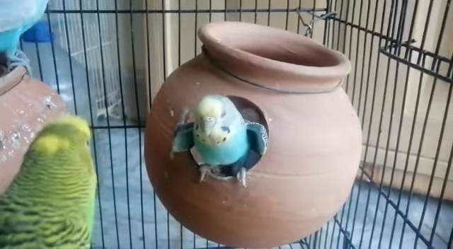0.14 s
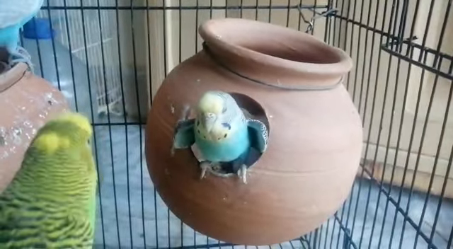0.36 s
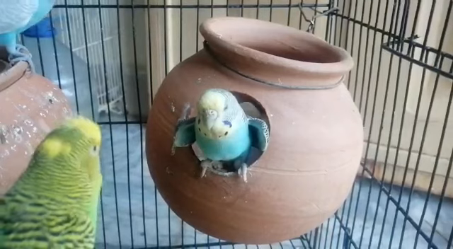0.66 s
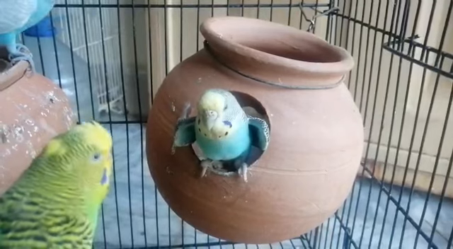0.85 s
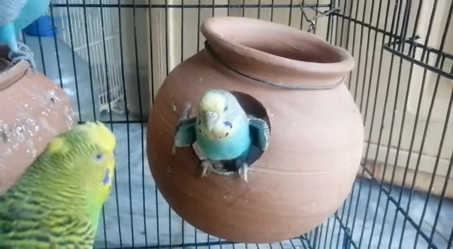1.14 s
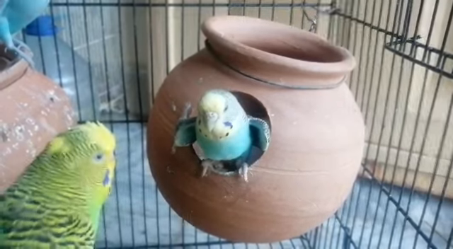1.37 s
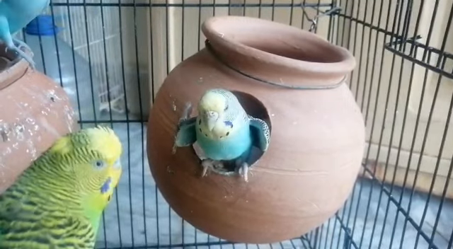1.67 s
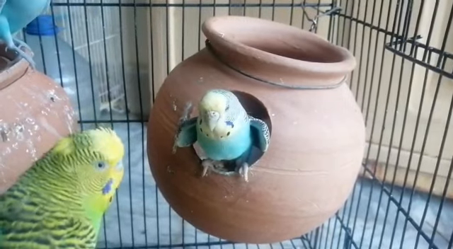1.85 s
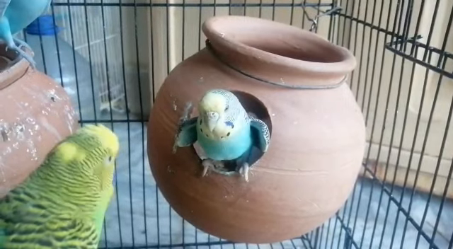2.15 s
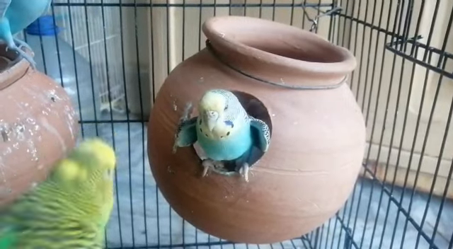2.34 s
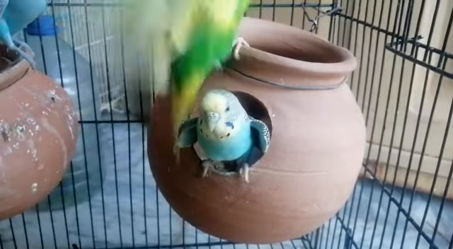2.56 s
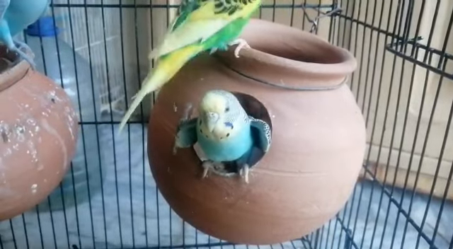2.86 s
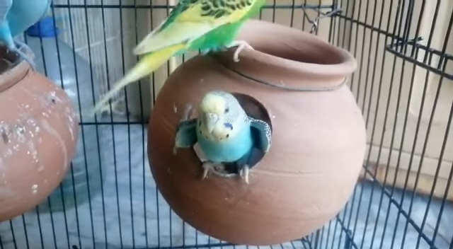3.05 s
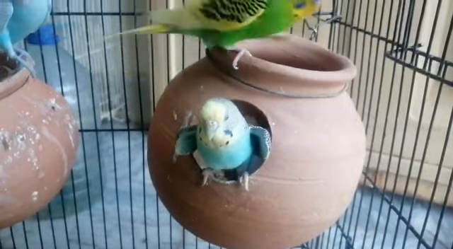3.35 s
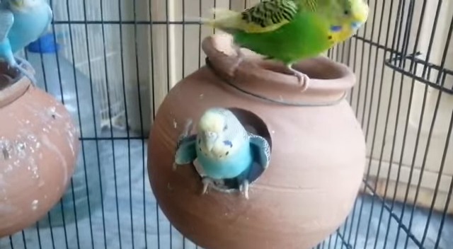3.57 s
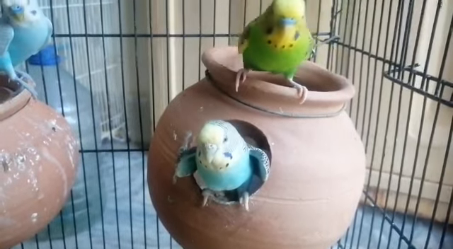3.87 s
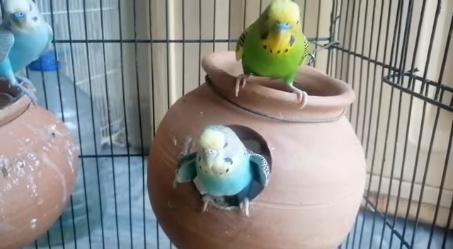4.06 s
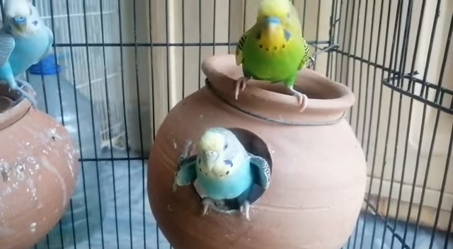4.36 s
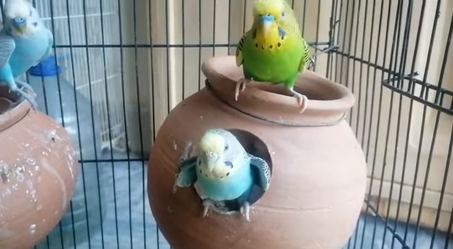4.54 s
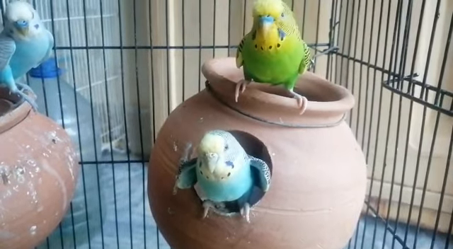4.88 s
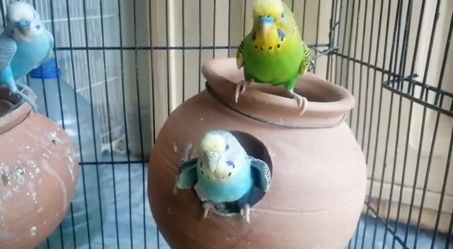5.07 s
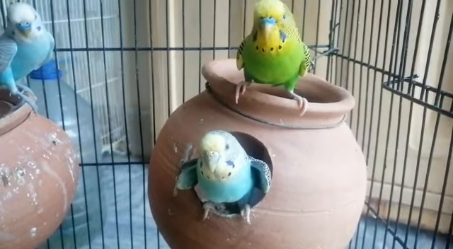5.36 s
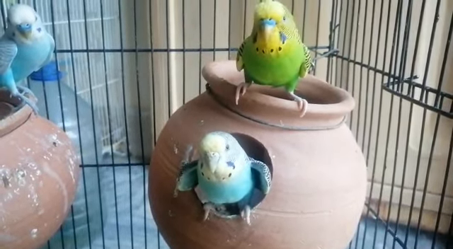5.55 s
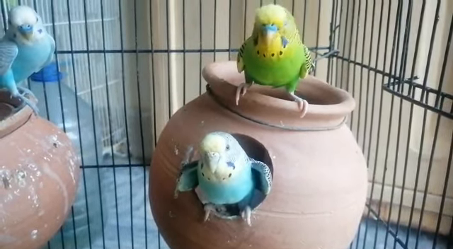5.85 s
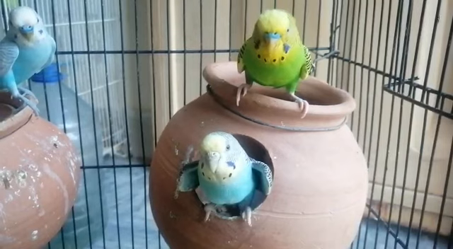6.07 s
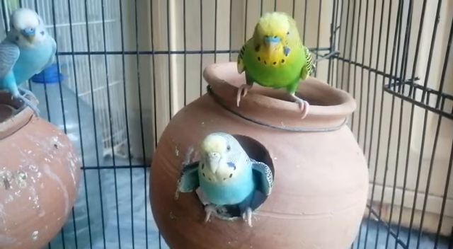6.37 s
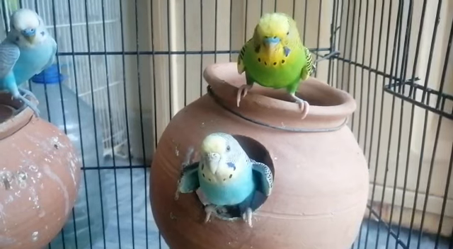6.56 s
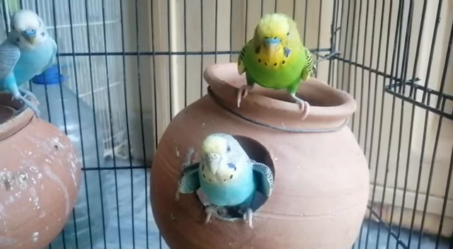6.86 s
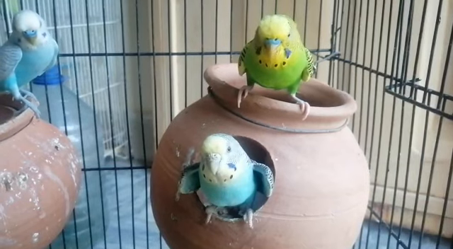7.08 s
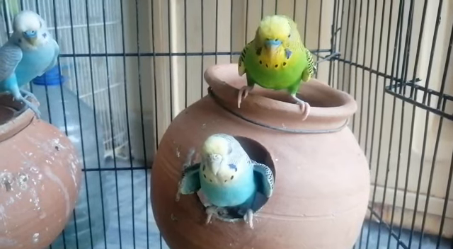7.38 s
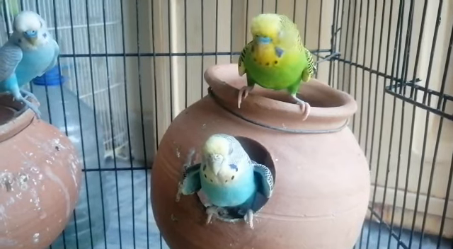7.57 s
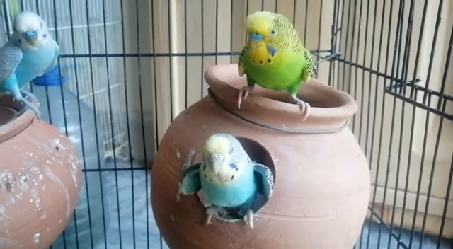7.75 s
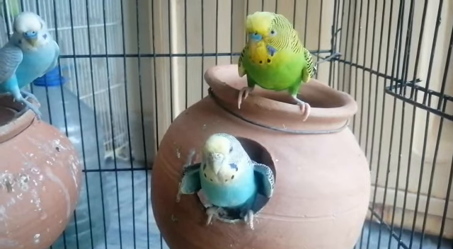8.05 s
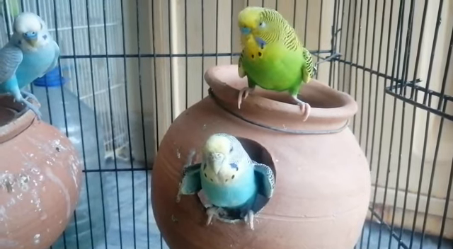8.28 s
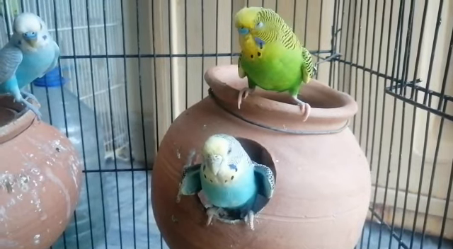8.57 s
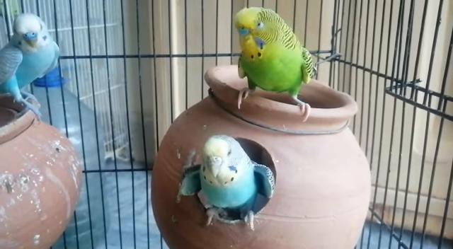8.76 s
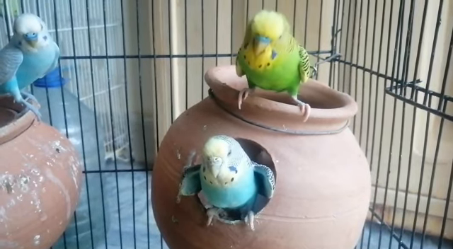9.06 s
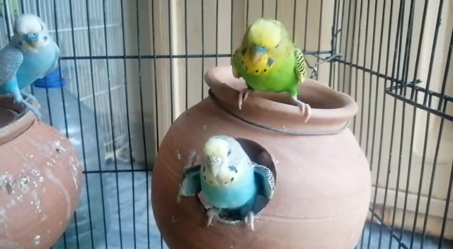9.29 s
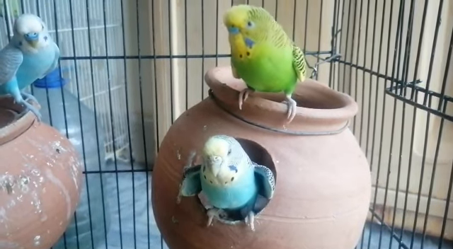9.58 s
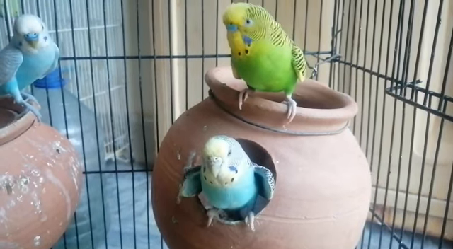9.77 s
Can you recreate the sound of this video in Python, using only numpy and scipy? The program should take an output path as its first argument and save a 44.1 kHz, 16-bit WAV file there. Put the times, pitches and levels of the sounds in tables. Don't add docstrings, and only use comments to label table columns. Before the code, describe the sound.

Close dry beak clicks, brief whistles and scratchy rasps stand in front of more distant, reverberant parrot calls. A faint flock fades away early; a wing flutter thumps softly at the left. Later come zigzag warbles, small croaks, faint feather brushes and foot rubs on clay, then a falling cry, a long rising call and a final flurry of harsh chirps. A small handheld stereo microphone catches soft air noise and low hum.

```python
import sys
import numpy as np
from scipy import signal
from scipy.fft import rfft, irfft
from scipy.io import wavfile
from scipy.ndimage import uniform_filter1d

SR = 44100
rng = np.random.default_rng(int(sys.argv[2]) if len(sys.argv) > 2 else 0)


def invert_db(level):
    return 10 ** (np.asarray(level, dtype=float) / 20)


def store_pcm(level_fs):
    pcm = np.round(np.clip(level_fs, -1, 1) * 32767).astype(np.int16)
    wavfile.write(sys.argv[1], SR, np.atleast_2d(pcm).T)


N = 437472
TIME_S = np.arange(N) / SR

# (frequency [Hz], rms level [dB])
HUM_LINES = [(50, -73), (100, -72.5), (150, -70.5), (200, -88)]
# (frequency [Hz], density [dB per Hz])
AIR_SPECTRUM = [(200, -6), (350, -6), (1000, -7.5), (1700, -11), (3000, -13), (4200, -23), (6500, -5.5),
                (8200, -20), (10500, -22.5), (15500, -28)]
# (frequency [Hz], density [dB per Hz])
RUMBLE_SPECTRUM = [(12, -25), (20, -21), (49, 10.5), (75, 0.5), (103, 1), (195, -0.5), (229, -7),
                   (500, -8.5), (650, -75), (1100, -120)]
# (time [s], half width [s], rise [dB])
RUMBLE_SWELLS = [
    (0.028, 0.048, 9.5),
    (2.62, 0.037, 13),
    (4.45, 0.09, 5),
    (5.299, 1, 6),
    (8.652, 0.35, 8),
]
# (time [s], level [dB])
FLOCK_LEVEL = [
    (0, -38.5),
    (.4, -47.5),
    (.8, -46),
    (1.2, -41),
    (1.6, -49),
    (2.0, -52.5),
    (2.4, -47.5),
    (2.7, -108),
    (9.92, -45.5),
]
# (pitch [Hz], share of notes [1])
FLOCK_PITCHES = [(3350, .5), (2800, 0.2), (2250, 0.3)]
# (frequency [Hz], decay time t60 [s])
PORCH_DECAY = [(300, 0.61), (1000, 0.6), (3000, 0.65), (6000, 0.61), (12000, 0.3)]
# (time [s], length [s], pitch [Hz], level [dB])
NASAL_CHURRS = [
    (0.042, 0.12, 1125, -43.5),
    (0.551, 0.21, 1105, -48),
    (0.855, 0.13, 1122, -43.5),
    (1.114, 0.085, 1130, -35),
    (1.412, 0.1, 1148, -43.5),
    (1.706, 0.091, 1110, -46.5),
    (1.989, 0.16, 1112, -46),
    (2.275, 0.086, 1137, -48.5),
]
# (frequency [Hz], gain [dB])
NASAL_THROAT = [(1100, -27.5), (2250, -5.5), (3350, 5), (4500, -9), (5600, -13.5), (6700, -16), (9000, -39)]
# (time [s], length [s], start pitch [Hz], end pitch [Hz], level [dB])
HARSH_CALLS = [
    (3.63, 0.12, 1150, 390, -45.5),
    (4.433, 0.12, 866, 629, -43),
    (7.096, 0.11, 1045, 375.5, -42),
]
# (time [s], length [s], start pitch [Hz], end pitch [Hz], level [dB])
RINGING_CALLS = [
    (0.89, 0.075, 1330, 1420, -41.5),
    (4.732, 0.098, 747, 642, -44.5),
    (7.382, 0.12, 1274, 992, -39),
]
# (time [s], length [s], start pitch [Hz], end pitch [Hz], level [dB])
ROUND_CALLS = [
    (0.485, 0.15, 1517, 1198, -53),
    (3.927, 0.024, 3130, 2510, -26.5),
    (3.952, 0.041, 1890, 1500, -44),
    (4.13, 0.17, 1088, 669.6, -46),
    (5.02, 0.11, 814, 677.5, -47.5),
    (7.703, 0.16, 1533, 1036, -34.5),
    (8.04, 0.26, 1210, 1583, -31),
]
# (frequency [Hz], gain [dB])
FAR_BIRD_THROAT = [(400, -7), (750, -3), (1600, -5.5), (2200, 4.5), (3100, 7.5), (4200, -9.5), (5500, -4.5),
                   (7200, -7), (9000, -40)]
# (frequency [Hz], gain [dB])
DEEP_THROAT = [(400, -2), (750, -3), (1500, -2), (2100, -8), (3200, 7), (4200, -8), (5500, -0.5),
               (7200, -18), (9000, -45)]
# (time [s], half width [s], level [dB])
POT_SHUFFLES = [
    (2.35, .06, -69),
    (2.97, 0.13, -60.5),
    (5.64, 0.033, -56.5),
    (6.06, 0.053, -60),
    (6.4, .06, -59),
]
# (time [s], level [dB])
FEATHER_BRUSHES = [
    (4.315, -53),
    (4.37, -58),
    (5.03, -53),
    (7.66, -51),
    (7.6, -60),
    (8.15, -51),
    (8.47, -49),
    (9.13, -52),
    (9.45, -54),
]
# (time [s], peak level [dB], swing frequency [Hz])
WING_PUFFS = [
    (2.57, -43, 48),
    (2.624, -46, 46.3),
    (2.677, -57, 44),
]
# (time [s], peak level [dB], left-right difference [dB])
WIRE_TICKS = [(0.2159, -48, 9.0), (0.3222, -40, 11), (0.3795, -40, 5), (1.2635, -47, 6.5), (1.8103, -48, 1),
              (1.9899, -51, 7), (2.17, -48, 7.0), (2.3491, -32, 8), (2.527, -37, 0), (3.933, -61, -3),
              (4.2323, -43, 6), (4.3096, -34, 9), (4.6349, -43, 0.0), (5.563, -24, -17.5), (5.6027, -31, 7),
              (5.6511, -36, 16), (6.611, -62, -6), (6.618, -48, 0), (6.65, -58, 0), (5.571, -45, -10),
              (7.1548, -45, 7), (7.4155, -38, 0.0), (7.7398, -35, 3), (8.427, -36, 0.5), (8.8209, -54, 0.5),
              (8.9955, -31, 10), (9.0743, -39, -1), (9.3442, -40, 13), (9.4015, -29, 7), (9.5342, -33, 2.5),
              (9.615, -31, 9), (9.698, -31, 10), (9.846, -51, -1)]
# (time [s], length [s], middle pitch [Hz], level [dB])
BACK_LIFTS = [(0.211, 0.015, 3050, -37), (0.605, 0.031, 2720, -63), (0.899, 0.032, 2850, -41),
              (1.25, 0.027, 3086, -31), (1.39, 0.021, 2777, -30.5), (1.406, 0.028, 3434, -34.5),
              (3.248, 0.023, 2950, -43.5), (3.441, 0.029, 3075, -31), (3.478, 0.033, 2744, -39),
              (3.73, 0.037, 2896, -41), (4.637, 0.01, 3230, -30.5), (6.16, 0.034, 3237, -39.5),
              (6.2, 0.027, 2630, -46.5), (6.625, 0.01, 1765, -40), (9.1, 0.017, 2970, -30.5),
              (9.189, 0.037, 2967, -28)]
# (time [s], length [s], middle pitch [Hz], level [dB])
BACK_DIPS = [(1.005, 0.044, 2204, -35), (1.611, 0.029, 2260, -42), (1.987, 0.013, 3350, -39.5),
             (3.508, 0.027, 2035, -44.5), (3.69, 0.0087, 2000, -31.5), (4.626, 0.017, 3090, -29.5),
             (8.319, 0.023, 2530, -36), (8.682, 0.035, 2380, -33.5), (8.913, 0.01, 3040, -47),
             (9.165, 0.036, 2834, -26), (9.398, 0.013, 2490, -39)]
# (time [s], peak level [dB], length [s], upper throat gain [dB])
RASP_CALLS = [(0.2093, -16.5, 0.028, -5), (0.441, -19.5, 0.027, -10), (0.607, -21.5, 0.022, -5),
              (0.865, -21, 0.03, -14), (1.252, -18, 0.019, 21), (2.932, -33.5, 0.037, -16),
              (3.07, -22.5, 0.016, -9.5), (3.234, -24, 0.013, -7), (3.302, -30, 0.038, 20),
              (3.336, -17, 0.023, -9.5), (3.44, -34, .03, 20), (4.365, -30, 0.016, -34),
              (4.624, -15, 0.025, -4), (5.555, -47, 0.0099, -15), (5.6, -18, 0.0083, -13),
              (5.75, -25.5, 0.03, 30), (5.868, -27, 0.018, 19.5), (5.647, -16.5, 0.018, -8),
              (6.27, -35.5, 0.062, 24), (7.343, -30.5, 0.029, -9), (8.714, -21.5, 0.0074, -15.5),
              (9.072, -12.5, 0.04, 31), (9.221, -16, 0.013, -26), (9.243, -19, 0.017, 38),
              (9.39, -14, 0.041, 69), (9.399, -15.5, 0.11, 87), (9.455, -31.5, 0.0073, 57),
              (9.609, -18.5, 0.03, 57), (9.691, -15, 0.017, -2), (9.72, -21, 0.057, -12),
              (9.526, -15.5, 0.036, 25)]
# (time [s], peak level [dB], length [s], lower throat gain [dB])
CROAK_CALLS = [(6.045, -24.5, 0.0039, -9), (6.324, -31.5, 0.023, 5.5), (6.348, -25, 0.019, 3),
               (6.4827, -33.5, 0.0062, 37), (6.521, -35, 0.0044, 21), (6.774, -31, 0.007, 5),
               (6.806, -24.5, 0.007, 3), (6.76, -38, 0.01, -2), (6.93, -32, 0.008, 16),
               (6.961, -30, 0.005, 8), (6.964, -23.5, 0.027, 2.5), (7.572, -21, 0.0056, -7),
               (8.819, -16, 0.0063, -27), (9.75, -24.5, 0.0073, 2.5)]
# (time [s], peak level [dB], upper throat gain [dB])
BEAK_CLICKS = [(0.737, -25, -18), (1.8098, -11.5, -4.5), (1.9901, -15.5, -1), (2.1706, -11, 2),
               (2.349, -11, 3), (2.5255, -16, -5), (5.153, -21, 28), (6.625, -29, -10),
               (7.325, -17.5, -16.5), (7.741, -12, 47), (7.952, -27, 1), (8.3363, -20, 7),
               (8.602, -28.5, -28), (9.0662, -14, -8.5), (9.8483, -14.5, -8.5)]
# (frequency [Hz], width [Hz], gain [dB])
THROAT_MODES = [(890, 260, 25), (1800, 1440, 24.5), (2422, 666, 32), (3350, 310, 32), (5127, 1190, 39),
                (6320, 1280, 38)]
# (level [dB], overtone tilt [dB per octave], path of (time [s], pitch [Hz]))
WARBLED_RUNS = [(-34.5, -2, [(5.648, 790), (5.665, 955), (5.682, 1054), (5.704, 947)]),
                (-37, -5.5, [(5.722, 2460), (5.733, 1940), (5.743, 2240), (5.754, 1850), (5.764, 2156),
                (5.774, 1640), (5.786, 1850)]), (-30, -9, [(5.848, 2350), (5.857, 2710), (5.865, 2700)]),
                (-37, -5, [(5.867, 1910), (5.874, 1565), (5.882, 1310)]), (-34.5, -2.5, [(5.897, 2857),
                (5.912, 2424), (5.922, 2435), (5.93, 1810), (5.94, 1540), (5.949, 1650)]),
                (-51, -34, [(6.69, 3500), (6.71, 3310), (6.735, 2980)]), (-42, -30, [(3.345, 1885),
                (3.357, 2270), (3.378, 2260)]), (-47, -27, [(0.5, 2950), (0.535, 2630), (0.555, 2050)]),
                (-28.5, -8.5, [(8.35, 3634), (8.372, 3104), (8.384, 2020)]), (-31, -10, [(8.413, 1905),
                (8.425, 3303), (8.442, 3213), (8.455, 2895), (8.466, 1690), (8.482, 2320)]),
                (-39.5, -16, [(8.654, 1930), (8.668, 2385), (8.681, 1700)]), (-29.5, -7, [(8.988, 1710),
                (9.0, 2620), (9.013, 1750)]), (-33.5, -9, [(9.44, 1837), (9.453, 3050), (9.466, 2300)]),
                (-28, -7.5, [(9.527, 1766), (9.541, 3380), (9.557, 2020)]), (-29, -6, [(9.611, 1650),
                (9.625, 3310), (9.638, 2010)]), (-25.5, -4, [(9.694, 1644), (9.708, 3390), (9.716, 2790)]),
                (-30.5, -16, [(3.648, 3600), (3.655, 3015), (3.668, 3300), (3.69, 3080)]),
                (-33, -20, [(3.738, 2500), (3.752, 3300), (3.77, 2700)]), (-36, -22, [(1.695, 2900),
                (1.72, 2390), (1.745, 2000)])]
# (frequency [Hz], gain [dB])
RUN_THROAT = [(800, 3), (1500, -8), (2100, -2.5), (3000, 6), (4200, -8), (5500, -0.5), (8000, -8),
              (12000, -30)]
# (time [s], pitch [Hz], level [dB])
NEAR_PIPS = [(0.032, 3390, -41), (0.459, 3190, -35), (0.876, 3310, -31), (2.524, 3350, -34),
             (5.155, 3300, -29), (5.544, 2584, -35), (5.596, 3084, -25.5), (6.144, 2227, -33),
             (6.207, 2420, -37.5), (6.808, 2255, -36), (7.057, 1875, -42.5), (0.699, 3194, -30.5),
             (8.699, 3140, -35), (8.945, 1610, -46.5), (7.985, 2460, -26), (8.601, 2450, -38)]
# (time [s], length [s], top pitch [Hz], climb [octaves], level [dB])
NEAR_ARCHES = [(0.316, 0.01, 2520, 0.427, -30), (0.376, 0.013, 2480, 0.53, -29),
               (3.339, 0.016, 882, 0.11, -39), (3.5, 0.055, 3350, 0.157, -51),
               (6.375, 0.0066, 2230, 0.19, -38), (6.331, .014, 800, .05, -49),
               (3.235, 0.011, 950, .1, -37.5), (6.596, 0.012, 2300, 0.19, -45.5),
               (4.8, 0.0146, 2930, 0.62, -42), (8.883, 0.033, 2620, 0.279, -33.5),
               (9.071, 0.024, 2470, 0.306, -29.5), (9.336, 0.028, 2740, 0.562, -28),
               (0.318, 0.0136, 5100, 0.25, -29)]
# (time [s], length [s], middle pitch [Hz], drop [octaves], level [dB])
NEAR_FALLS = [(2.635, 0.12, 3410, 0.21, -53), (3.771, 0.036, 2400, 1.33, -31),
              (4.4, 0.049, 2400, 0.43, -41), (4.366, 0.014, 1530, -0.074, -29),
              (5.061, 0.05, 3240, 1.28, -32), (8.007, 0.036, 2147, 0.92, -27), (3.6, 0.014, 2940, 0.3, -49),
              (3.622, 0.0093, 2900, .5, -33), (4.2, 0.015, 3650, .3, -52), (9.4, 0.012, 2710, 1.03, -36),
              (3.243, 0.024, 2700, 0.89, -37.5), (3.1, 0.04, 2600, 1, -37), (4.1, 0.013, 3000, 0.25, -35),
              (3.606, 0.016, 2200, 0.35, -44)]
# (time [s], length [s], landing pitch [Hz], swoop [octaves], level [dB])
NEAR_SWOOPS = [(1.38, 0.016, 3000, 0.93, -29.5), (6.82, 0.012, 2100, 0.2, -43),
               (7.318, 0.023, 840, 0.079, -41.5), (7.901, 0.059, 3110, -0.057, -27.5),
               (7.9, 0.0585, 2437, -0.26, -39), (8.815, 0.0096, 897, -0.31, -37.5),
               (9.116, 0.031, 3300, 0.57, -31), (9.146, 0.022, 3400, 0.53, -25),
               (9.115, 0.028, 1700, .4, -38), (9.706, 0.045, 640, 0.29, -49.5),
               (9.708, 0.015, 830, 0.014, -41), (9.368, 0.011, 880, 0.11, -51),
               (1.448, 0.08, 1200, 0.55, -51.5), (1.05, 0.0584, 1400, .4, -49.5),
               (0.604, 0.03, 1330, 0.05, -40), (0.625, 0.069, 1500, .03, -47),
               (3.085, 0.045, 1200, .1, -50), (3.66, 0.07, 2100, .2, -41.5), (8.14, 0.03, 750, 0.25, -47.5),
               (8.56, 0.028, 750, 0.22, -55.5)]
# (frequency [Hz], gain [dB])
WHISTLE_THROAT = [(400, -36), (750, -14), (1300, -13.5), (1900, -11.5), (2900, 15), (4100, 5), (5300, 20),
                  (7200, 21.5), (9000, 14.5), (15000, -20)]
# (frequency [Hz], left-right difference [dB])
PORT_COLOUR = [(250, -2), (500, 0), (1000, 3), (2500, -3), (4500, -7.5), (8000, 2.5), (12000, -1.5)]


def rms_one(x):
    return x / np.sqrt(np.mean(x ** 2) + 1e-20)


def at_hz(points, hz):
    table = np.array(points)
    return np.interp(np.log(hz), np.log(table[:, 0]), table[:, 1])


def spectrum_hz():
    return np.maximum(np.arange(N // 2 + 1) * SR / N, 1)


def drift(rate_hz):
    r = np.exp(-2 * np.pi * rate_hz / SR)
    settling = 9999
    noise = rng.standard_normal(N + settling)
    return rms_one(signal.lfilter([1], [1, -2 * r, r * r], noise)[settling:])


def resonance(x, hz, width_hz):
    r = np.exp(-np.pi * width_hz / SR)
    zeros = np.array([1, 0, -1]) * (1 - r * r) / 2
    return signal.lfilter(zeros, [1, -2 * r * np.cos(2 * np.pi * hz / SR), r * r], x)


def band(x, low_hz, high_hz):
    return signal.sosfilt(signal.butter(2, [low_hz, high_hz], "band", fs=SR, output="sos"), x)


def coloured(spectrum, alike):
    mid, side = rfft(rng.standard_normal((2, N)))
    hz = spectrum_hz()
    alike = np.clip(alike, 0, 1) / (1 + (hz / 1100) ** 2)
    pair = np.sqrt(1 + alike) * mid + np.sqrt(1 - alike) * side * [[1], [-1]]
    return rms_one(irfft(pair * invert_db(at_hz(spectrum, hz)), N))


def sides(pan_db):
    return invert_db(np.array([[.5], [-.5]]) * pan_db)


def add(track, start_s, sound):
    i = round(start_s * SR)
    track[..., i:i + sound.shape[-1]] += sound[..., :N - i]


def progress(length_s):
    return np.arange(round(length_s * SR)) / (length_s * SR)


def syrinx(pitch_hz, tilt_db, knee, throat, closed_db=0, first_db=0):
    k = np.arange(1, 25)[:, None]
    slope_db = tilt_db * np.log2(np.maximum(k / knee, 1)) + closed_db * np.log2(k) + first_db * (k == 1)
    gains = invert_db(slope_db + at_hz(throat, k * pitch_hz)) * (k * pitch_hz < 15000)
    phase = k * np.cumsum(2 * np.pi * pitch_hz / SR) + k * k / 2
    return rms_one(np.sum(gains * np.sin(phase), axis=0))


def mains_hum():
    return sum(invert_db(db) * np.sin(2 * np.pi * hz * TIME_S) for hz, db in HUM_LINES)


def air():
    return invert_db(-60.5 + 2.2 * drift(2.5)) * coloured(AIR_SPECTRUM, alike=.55)


def rumble():
    calm_db = -65.5
    rise_db = sum(db * np.exp(-((TIME_S - s) / width) ** 2) for s, width, db in RUMBLE_SWELLS)
    return invert_db(calm_db + rise_db) * coloured(RUMBLE_SPECTRUM, alike=0.77)


def ducking(birds):
    from_db, share, recovery_db_per_s = -37, 0.53, 34
    level_db = 10 * np.log10(uniform_filter1d(np.mean(birds ** 2, axis=0), size=1024) + 1e-12)
    ramp = recovery_db_per_s * TIME_S
    held_db = np.maximum.accumulate(level_db + ramp) - ramp
    return invert_db(-share * np.maximum(held_db - from_db, 0))


def flock():
    out, wobble = np.zeros(N), drift(323)
    pitches, shares = np.transpose(FLOCK_PITCHES)
    scatter = .16
    for when, pick, span, bow, slide, loud in rng.random((650, 6)):
        length_s = .012 + .03 * span
        u = np.arange(0, 1, 1 / (SR * length_s))
        choice = np.searchsorted(np.cumsum(shares / sum(shares)), pick)
        home = pitches[min(choice, len(pitches) - 1)]
        start = int(when * (N - len(u)))
        bend = scatter * (bow - .5) + .22 * (slide - .6) * (u - .5)
        pitch = home * (1 + bend + .045 * wobble[start:start + len(u)])
        phase = np.cumsum(2 * np.pi * pitch / SR)
        tone = np.sin(phase) + 0.52 * np.sin(2 * phase)
        add(out, start / SR, invert_db(10 * loud) * np.sin(np.pi * u) * tone)
    return invert_db(np.interp(TIME_S, *np.transpose(FLOCK_LEVEL))) * rms_one(out)


def porch(x, alike=0.0071):
    t, tail = np.arange(SR) / SR, 0
    common, left, right = rng.standard_normal((3, SR))
    noise = np.sqrt(alike) * common + np.sqrt(1 - alike) * np.array([left, right])
    edges = 200 * 2 ** np.arange(0, 6.6, .5)
    for low, high in zip(edges, edges[1:]):
        t60_s = at_hz(PORCH_DECAY, np.sqrt(low * high))
        tail = tail + band(noise, low, high) * invert_db(-60 * t / t60_s)
    tail = tail * (1 - np.exp(-t / 0.0036))
    tail = tail / np.sqrt(np.sum(tail ** 2) / 2)
    return signal.fftconvolve(x[None], tail, axes=1)[:, :len(x)]


def churrs():
    out, wobble = np.zeros(N), drift(106)
    for s, length, pitch_hz, level_db in NASAL_CHURRS:
        u = progress(length)
        shake = wobble[round(s * SR):][:len(u)]
        swell = np.sin(np.pi * u) ** 0.21 * invert_db(level_db + 5.26 * shake[::-1])
        add(out, s, swell * syrinx(pitch_hz * (1 + 0.0131 * shake), 0, knee=1, throat=NASAL_THROAT))
    return out


def far_bird(settle=.95):
    out, torn, wobble = np.zeros(N), np.zeros(N), drift(85)
    breath = 1.3 * np.tanh(drift(700))
    flutter = wobble[::-1]
    climb_share, climb_db, hold_loss_db, fall_loss_db = .55, 6.5, 25.5, 7
    opening_s, closed_tilt_db = .035, -22
    kinds = [(HARSH_CALLS, -2.5, 0), (RINGING_CALLS, -1.5, -13), (ROUND_CALLS, -11, -17)]
    calls = [(*row, tilt_db, harsh_db) for table, tilt_db, harsh_db in kinds for row in table]
    for s, length, start_hz, end_hz, level_db, tilt_db, harsh_db in calls:
        u, i = progress(length), round(s * SR)
        if end_hz > start_hz:
            climbed = u / climb_share
            way = np.minimum(climbed, 1)
            effort_db = np.minimum(climb_db * (climbed - 1), hold_loss_db * (1 - climbed))
        else:
            bend = settle * start_hz / end_hz
            way = (1 - np.exp(-bend * u)) / (1 - np.exp(-bend))
            effort_db = fall_loss_db * (.5 - u)
        pitch = (start_hz + (end_hz - start_hz) * way) * (1 + 0.0073 * wobble[i:][:len(u)])
        effort_db = effort_db + 3 * flutter[i:][:len(u)]
        attack_s = max(0.0087 * (800 / start_hz) ** 3, .007)
        edges = np.minimum((1 - u) / 0.22, 1) * np.minimum(u * length / attack_s, 1)
        swell = invert_db(level_db + effort_db) * edges
        closed_db = closed_tilt_db * np.maximum(1 - u * length / opening_s, 0) * (start_hz < 1250)
        first_db = -4.5 * (max(start_hz, end_hz) > 1500)
        throat = DEEP_THROAT if start_hz < 900 else FAR_BIRD_THROAT
        add(out, s, swell * syrinx(pitch, tilt_db, 2.05, throat, closed_db, first_db))
        opened = invert_db(harsh_db) * np.minimum(u * length / opening_s, 1)
        add(torn, s, swell * opened * syrinx(pitch, 9, knee=1, throat=FAR_BIRD_THROAT))
    return out + band(torn * breath, 1500, 7400)


def shuffles():
    rub = rms_one(band(rng.standard_normal(N), 220, 700))
    level = sum(invert_db(db) * np.exp(-((TIME_S - s) / width) ** 2) for s, width, db in POT_SHUFFLES)
    return rub * invert_db(2.7 * drift(40)) * level


def brushes():
    half_width_s = 0.036
    high_pass = signal.butter(2, 9000, "high", fs=SR, output="sos")
    hiss = signal.sosfilt(high_pass, rng.standard_normal((2, N)))
    return hiss * sum(invert_db(db) * np.exp(-((TIME_S - s) / half_width_s) ** 2) for s, db in FEATHER_BRUSHES)


def puffs():
    out, t = np.zeros(N), np.arange(round(.15 * SR)) / SR
    envelope = (1 - np.exp(-t / 0.0006)) * np.exp(-t / 0.012)
    for s, peak_db, swing_hz in WING_PUFFS:
        add(out, s, invert_db(peak_db + 13) * np.sin(2 * np.pi * swing_hz * t) * envelope)
    return out * sides(20)


def ticks():
    out, t = np.zeros((2, N)), np.arange(300) / SR
    snaps = rng.standard_normal((len(WIRE_TICKS), len(t))) * np.exp(-t / 0.00099)
    for (s, peak_db, pan_db), snap in zip(WIRE_TICKS, resonance(snaps, 7300, 6000)):
        add(out, s, invert_db(peak_db) * snap / np.max(np.abs(snap)) * sides(pan_db))
    return out


def whistles(notes, tilt_db, waver, flutter_db):
    out, wobble, flutter = np.zeros(N), drift(278), drift(170)
    for s, length, mid_hz, level_db, (before, after) in notes:
        u, i = progress(length), round(s * SR)
        start, middle, end = (1 - u) * (1 - 2 * u), 4 * u * (1 - u), u * (2 * u - 1)
        arch = mid_hz * (2 ** before * start + middle + 2 ** after * end)
        pitch = arch * (1 + waver * wobble[i:i + len(u)])
        shake_db = flutter_db * np.clip(flutter[i:i + len(u)], -3, 1.5)
        swell = np.sin(np.pi * u) ** 0.22 * invert_db(level_db + shake_db)
        add(out, s, swell * syrinx(pitch, tilt_db, knee=1, throat=WHISTLE_THROAT))
    return out


def back_whistles():
    notes = [(*row, (-0.1, -0.0065)) for row in BACK_LIFTS] + [(*row, (0.148, 0.012)) for row in BACK_DIPS]
    return whistles(notes, tilt_db=-31.5, waver=0.023, flutter_db=5.5)


def rough_calls():
    closed_lower_db, croak_upper_db, click_s = -25, -22, 0.0039
    rasp_rows = [(*row, closed_lower_db) for row in RASP_CALLS]
    croak_rows = [(s, db, length, croak_upper_db, lower_db) for s, db, length, lower_db in CROAK_CALLS]
    click_rows = [(s, db, click_s, upper_db, closed_lower_db) for s, db, upper_db in BEAK_CLICKS]
    return rasp_rows + croak_rows + click_rows


def rasps(pulse_hz=750, jitter=.3):
    out, calls = np.zeros(N), rough_calls()
    cycles = np.cumsum(pulse_hz * np.exp(jitter * drift(150)) / SR)
    slaps = np.diff(np.floor(cycles), prepend=0)
    slaps = slaps * invert_db(2.6 * rng.standard_normal(N)) + 0.07 * rng.standard_normal(N)
    shifts = 1 + 0.04 * rng.standard_normal((len(calls), len(THROAT_MODES)))
    for (s, peak_db, length, upper_db, lower_db), shift in zip(calls, shifts):
        burst = slaps[round(s * SR):][:round(.15 * SR)].copy()
        t = np.arange(len(burst)) / SR
        burst *= np.minimum(t / (.25 * length), 1)
        burst[0] += 0.0056 / length
        burst *= np.exp(-(t / np.clip(length, .001, .1)) ** 2)
        ring = 0
        for (hz, width_hz, mode_db), move in zip(THROAT_MODES, shift):
            gain_db = mode_db + upper_db * (hz > 4300) + lower_db * (hz < 2000)
            once = resonance(burst, hz * move, width_hz)
            ring = ring + invert_db(gain_db) * resonance(once, hz * move, width_hz)
        add(out, s, invert_db(peak_db) * ring / np.max(np.abs(ring)))
    return signal.sosfilt(signal.butter(3, 8500, fs=SR, output="sos"), out)


def warbles(waver=.022, flutter_db=2.6):
    out, wobble, flutter = np.zeros(N), drift(250), drift(160)
    edge_s = 0.0022
    for level_db, tilt_db, path in WARBLED_RUNS:
        s, hz = np.transpose(path)
        i = np.arange(round(s[0] * SR), round(s[-1] * SR))
        glide = uniform_filter1d(np.interp(i / SR, s, hz), size=130, mode="nearest")
        pitch = glide * (1 + waver * wobble[i])
        edges = np.clip(np.minimum(i / SR - s[0], s[-1] - i / SR) / edge_s, 0, 1)
        swell = edges * invert_db(level_db + flutter_db * flutter[i])
        add(out, s[0], swell * syrinx(pitch, tilt_db, knee=1, throat=RUN_THROAT))
    return out


def near_whistles():
    notes = [(s, 0.0096, hz, db, (0, 0)) for s, hz, db in NEAR_PIPS]
    shapes = [(NEAR_ARCHES, (-1.513, -0.547)), (NEAR_FALLS, (.25, -0.84)), (NEAR_SWOOPS, (0.7, 0.04))]
    for table, shape in shapes:
        for s, length, hz, sweep, db in table:
            notes.append((s, length, hz, db, sweep * np.array(shape)))
    return whistles(notes, tilt_db=-23, waver=.03, flutter_db=3.5)


def scene():
    crowd = flock()
    far = far_bird() + invert_db(-6.0) * churrs()
    back, rough, runs, near = back_whistles(), rasps(), warbles(), near_whistles()
    direct = runs * sides(-2.3) + near * sides(2.2) + back * sides(-6.5) + rough * sides(3.0) + ticks()
    direct = direct + (invert_db(-0.5) * far + invert_db(-37) * crowd) * sides(-15)
    sent = invert_db(-7.5) * runs + invert_db(-7) * near + invert_db(-1.5) * back + invert_db(-5.5) * rough
    sent = sent + invert_db(7.5) * far + invert_db(2.5) * crowd
    earlier = invert_db(-1.5) * crowd[SR // 2:0:-1]
    echoes = porch(np.concatenate([earlier, sent]))[:, len(earlier):]
    birds = direct + echoes * sides(-2.3)
    birds[1] = np.roll(birds[1], 24)
    floor = (air() + rumble() + mains_hum()) * invert_db(3.5) * ducking(birds)
    return birds + floor + puffs() + brushes() + shuffles()


def low_pass(x):
    return signal.sosfilt(signal.butter(12, 15750, fs=SR, output="sos"), x)


def record(dry):
    ported = irfft(rfft(dry) * sides(at_hz(PORT_COLOUR, spectrum_hz())), N)
    cut = signal.sosfilt(signal.cheby2(12, 60, 15750, fs=SR, output="sos"), ported)
    mix = 0.71 * np.tanh(cut / 0.6)
    return low_pass(mix)


dry = scene()
out = record(dry)
store_pcm(out)
```